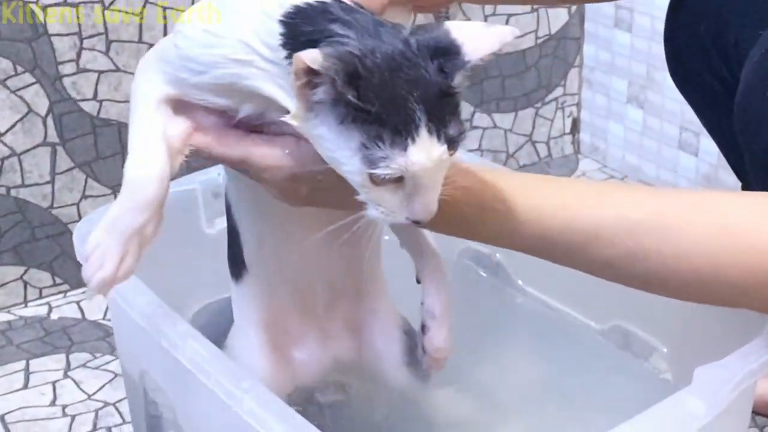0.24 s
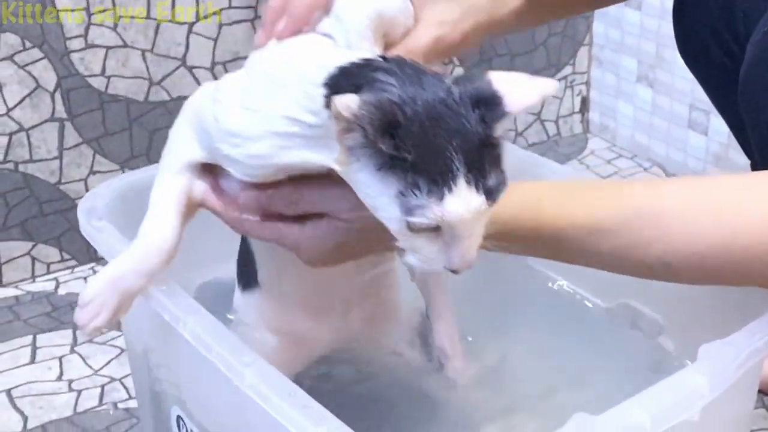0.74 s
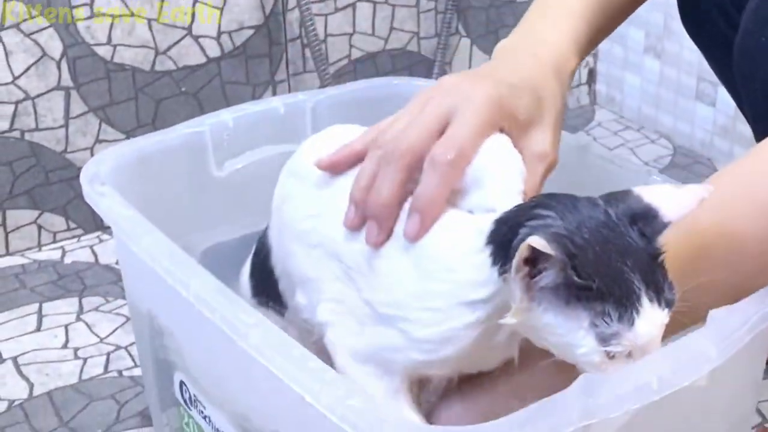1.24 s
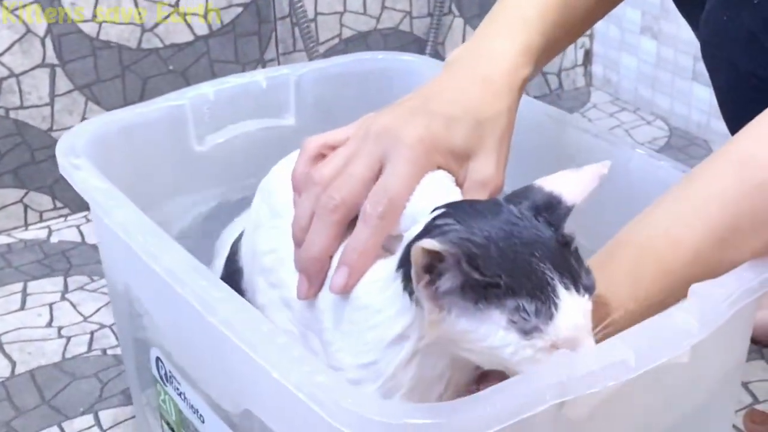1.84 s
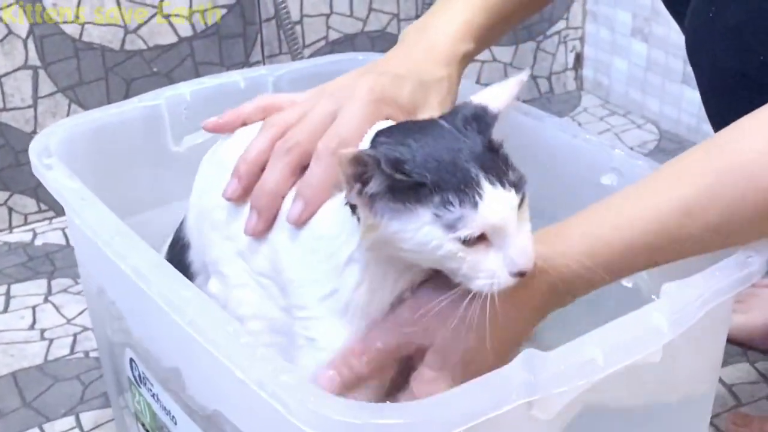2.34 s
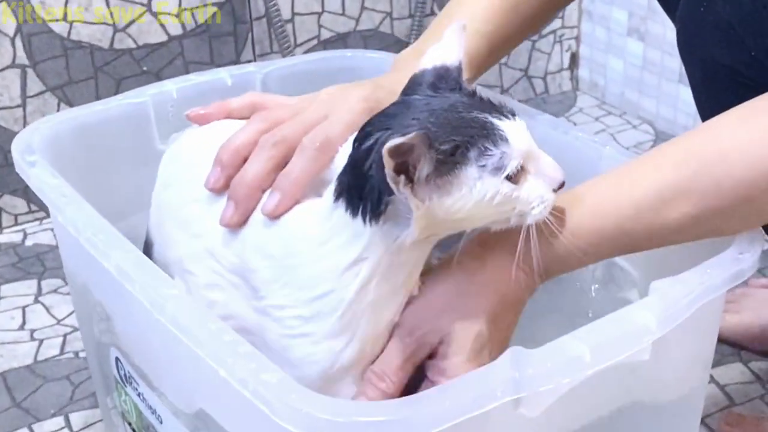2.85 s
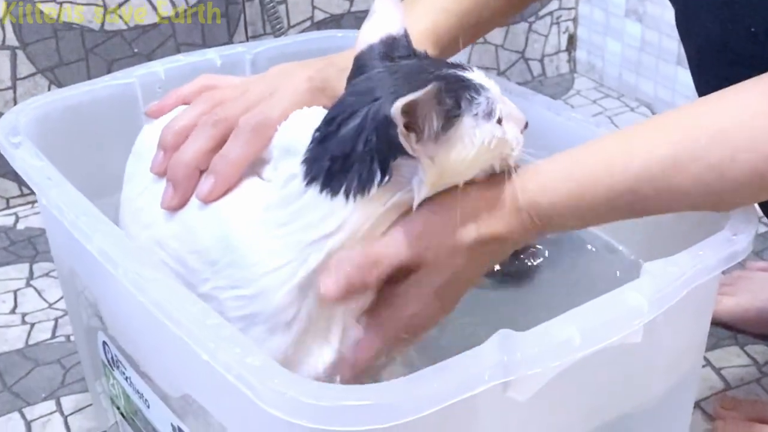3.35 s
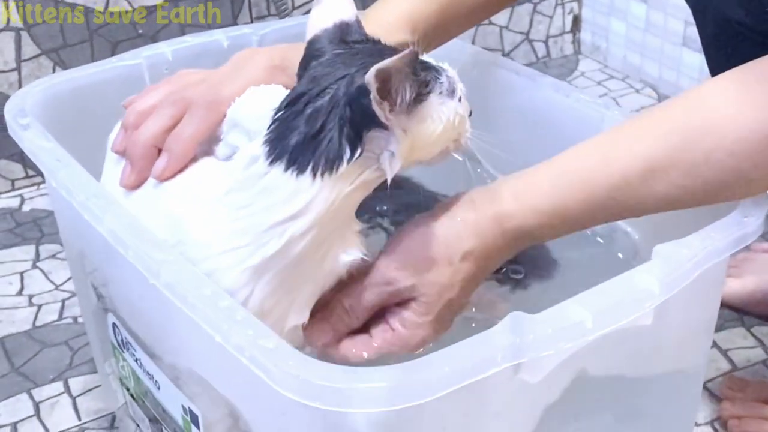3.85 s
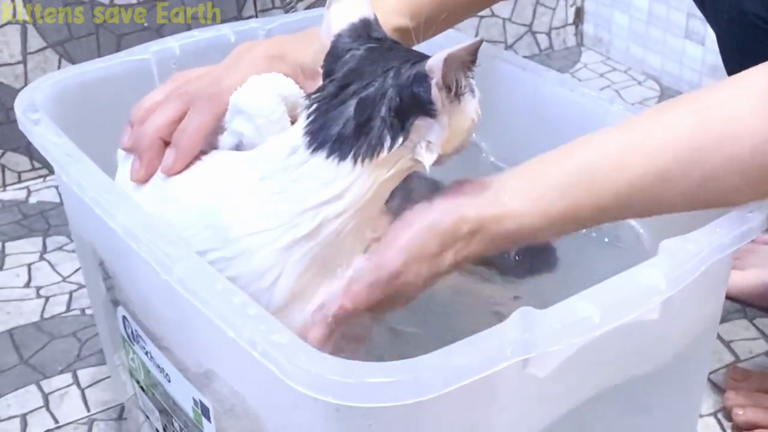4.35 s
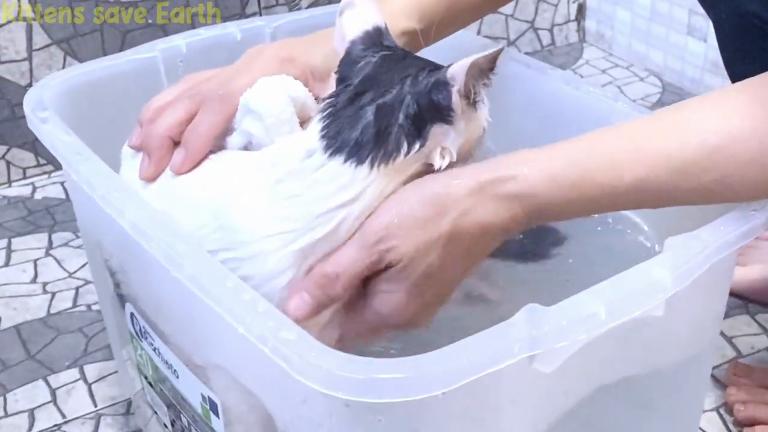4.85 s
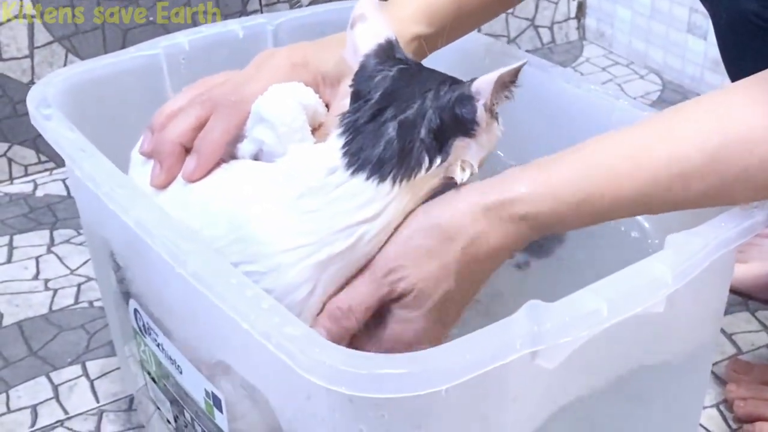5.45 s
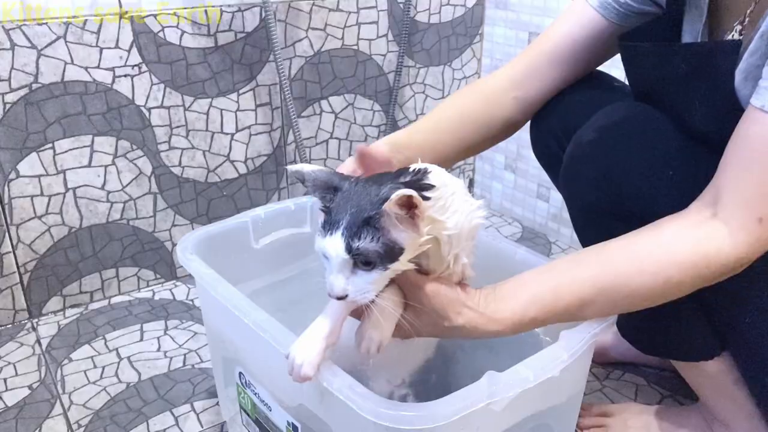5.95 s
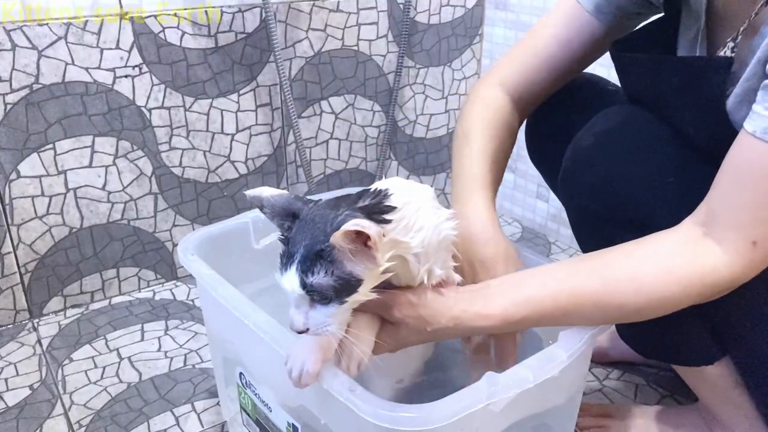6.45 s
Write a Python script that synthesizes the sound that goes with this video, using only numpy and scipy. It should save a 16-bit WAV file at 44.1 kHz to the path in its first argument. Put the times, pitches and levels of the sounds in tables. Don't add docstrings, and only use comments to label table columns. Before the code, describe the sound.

Heard close in stereo: sparse plinks in shallow water, then something lowered in with a rush of bubbles, froth and a low heave against the plastic walls. Sharp little plops and a pause with drips follow, then repeated hand splashes, wet slaps and gurgling rinses. An abrupt change leaves near silence with faint drops. The small tiled room adds a short bright reverberation.

```python
import sys
import numpy as np
from scipy import signal
from scipy.fft import rfft, irfft, next_fast_len
from scipy.io import wavfile
from scipy.ndimage import map_coordinates

SR = 44100
rng = np.random.default_rng(int(sys.argv[2]) if len(sys.argv) > 2 else 0)


def wrap_up_sound(samples):
    columns = np.atleast_2d(samples).T
    tamed = np.clip(columns, -1, 1)
    steps = np.round(tamed * 32767).astype(np.int16)
    wavfile.write(sys.argv[1], SR, steps)


def to_linear_factor(level_db):
    exponent = np.asarray(level_db, float) / 20
    return 10 ** exponent


N = 295205

# start in seconds, peak level in dB, pitch in Hz, level of the satellite droplets in dB.
DRIPS = [(.042, -53.5, 2390, -9), (0.166, -39, 3470, -7), (0.209, -51, 5130, -20), (0.479, -66, 1040, -1),
         (0.6493, -40.5, 1983, -9), (0.696, -53, 1980, -0.5), (0.9232, -45.5, 2760, -15.5),
         (0.924, -52.5, 1254, -3), (0.9924, -32, 1740, -11.5), (1.165, -54, 4000, -8.5),
         (1.2347, -49.5, 5000, -4.5), (0.6474, -55, 4530, 0.5), (3.566, -41, 1610, -16),
         (3.654, -44, 1244, -8), (3.7246, -42, 1425, -14), (3.8157, -53, 3670, -1.5),
         (3.9496, -46.5, 1546, -15.5), (4.007, -55, 1340, -14.5), (4.0817, -45, 1940, -10.5),
         (4.02, -51.5, 1093, -8.5), (4.15, -49, 2220, -8.5), (6.0604, -51, 3900, -14),
         (6.149, -59, 2076, 3.5), (6.2218, -48.5, 2120, -13), (6.251, -53, 2570, -10.5),
         (6.326, -56, 1690, -16.5), (6.366, -56.5, 5400, -2.5), (6.535, -52, 2645, -2.5),
         (6.558, -46, 5840, 0.5), (6.62, -40, 680, -10)]
PLUNGES = [(1.2781, -29, 2670, -5.5), (1.2823, -21, 3340, -15.5), (1.289, -30, 1360, -24),
           (1.671, -34, 1054, -9), (1.31, -28.5, 1055, -22), (1.321, -25, 3550, -4),
           (1.354, -16.5, 938, -12.5), (1.397, -22, 895, -3), (1.41, -26.5, 721, -12.5),
           (1.4546, -22, 2416, -10.5), (1.47, -28, 626, -13), (1.484, -27.5, 953, 0.5),
           (1.5743, -24, 2135, -8.5), (1.5866, -35, 4890, 5.5), (1.6694, -30, 1443, -4.5),
           (1.712, -37.5, 2130, 3.5), (1.8025, -30.5, 1500, -21), (1.843, -29, 824, -14),
           (1.8463, -28, 1534, -24), (1.8634, -30, 1340, -11), (1.879, -26.5, 781, -12),
           (1.8877, -29, 2720, 0.5), (1.951, -37.5, 1265, -2.5), (2.029, -32, 3990, -7),
           (2.0315, -30.5, 2270, -1), (2.0463, -40, 3000, -1), (2.062, -35, 1123, -11.5),
           (2.2244, -32, 1354, -5), (2.2294, -41, 3020, 11)]
DABS = [(2.4019, -47.5, 2370, -16), (2.4021, -43.5, 6670, -6.5), (2.606, -55, 570, 7),
        (2.605, -40, 3220, 7), (2.635, -39.5, 4400, -4), (2.605, -46, 2690, 6), (2.675, -54, 564, -5.5),
        (2.835, -49.5, 2740, -13.5), (2.9694, -40, 2310, -1), (2.9856, -36.5, 2163, -6.5),
        (3.0131, -19.5, 2170, -14.5), (2.6, -37.5, 4000, -17), (3.014, -29.5, 1615, -5),
        (3.315, -36, 8520, -9.5), (3.797, -54, 3300, 2.5), (3.305, -34, 1600, -17.5),
        (3.2858, -31.5, 3360, 0.5), (3.2887, -19.5, 1454, -5), (3.293, -23, 1090, -23),
        (3.308, -30.5, 709, -4.5), (3.3136, -26, 2830, 5), (3.483, -37.5, 958, -7), (3.328, -24, 1100, 3.5),
        (3.329, -26.5, 1780, -7.5), (3.372, -39, 1300, 5.5), (3.459, -29.5, 1600, -8.5),
        (3.4567, -41, 4550, -4), (3.458, -45, 6400, -8.5)]
SCOOPS = [(4.253, -41.5, 2410, -23), (4.251, -38, 1475, -5.5), (4.2624, -26.5, 3050, -9),
          (4.28, -22, 1494, -2), (4.282, -30, 1195, -12.5), (4.2812, -23.5, 3820, -10),
          (4.287, -24, 580, -18), (4.362, -31.5, 588, 2), (4.378, -22.5, 3780, -3),
          (4.3782, -23, 6120, -3.5), (4.42, -30, 1106, -35.5), (4.444, -36, 1540, -18.5),
          (4.5595, -36, 2000, -13), (4.572, -30.5, 3626, 3.5), (4.581, -13.5, 2030, -6.5),
          (4.7472, -34, 2020, -23), (4.7861, -21.5, 1708, 4.5), (4.789, -21, 1064, -52.5),
          (4.788, -21, 3380, -2.5), (4.808, -22, 3060, -9), (4.83, -18.5, 786, -3.5), (4.87, -30, 970, -10),
          (4.847, -26.5, 673, 2), (4.962, -33, 1550, -14.5), (4.986, -35.5, 635, -13.5),
          (4.86, -29, 540, -6)]
RINSES = [(5.1, -35, 1580, -10), (5.1108, -21, 2530, -21), (5.1461, -30.5, 3030, 4),
          (5.165, -31, 1150, 0.5), (5.186, -19.5, 866, -2.5), (5.188, -29, 608, -5), (5.204, -32, 940, 9.5),
          (5.5, -30.5, 753, -8), (5.267, -30.5, 1002, 7), (5.3162, -29, 3140, -11),
          (5.3179, -25.5, 2275, -4.5), (5.4167, -23.5, 1595, -11.5), (5.423, -27.5, 1216, -35),
          (5.481, -35, 570, -22), (5.485, -25, 997, -7.5), (5.495, -39.5, 3480, 2),
          (5.537, -33, 1080, -12.5), (5.556, -30, 1073, -15), (5.5873, -42, 1530, 4.5),
          (5.631, -39, 2800, -19), (5.68, -36.5, 1210, -27), (5.692, -35, 1440, -3),
          (5.715, -34, 1283, -10), (5.6982, -34.5, 2225, 1.5), (5.738, -25, 2660, -11.5),
          (5.766, -35, 633, 6.5), (5.778, -42, 5340, 6), (5.788, -26.5, 1041, -9),
          (5.893, -40.5, 1920, -5.5), (5.893, -28.5, 625, -36)]
# (s, dB, Hz, dB).
CLEAR = [(2.007, -45, 5150, 5.5), (2.0551, -33.5, 2177, -10), (3.014, -24.5, 2276, -9.5),
         (3.022, -32.5, 4080, -29), (3.03, -41, 3530, -12), (3.535, -55, 4080, -4), (3.56, -60, 7250, 7),
         (4.1145, -53.5, 5010, 3), (5.146, -41, 5090, -30), (5.4948, -44, 5180, -10),
         (5.497, -54, 6000, -9), (5.5867, -41.5, 4700, -7), (5.7883, -38.5, 4860, 3.5),
         (6.01, -66.5, 4950, -5), (6.594, -51.5, 678, -3)]
# (s, dB, Hz, dB).
POCKETS = [(1.002, -47, 1790, -25.5), (1.358, -31, 1420, -18.5), (2.0555, -33, 2200, -30),
           (5.788, -30.5, 800, -15), (3.0295, -33, 2700, -27), (3.2862, -29, 1700, -19),
           (3.2965, -19.5, 1493, -16), (3.3125, -17, 1546, -25), (3.328, -23, 1460, -14),
           (4.575, -20, 2030, -18.5), (5.168, -30.5, 1650, -8.5), (5.3185, -28.5, 1514, -16.5),
           (5.789, -38, 1018, -17.5), (3.02, -49.5, 700, -12.5), (4.3, -43, 768, -15),
           (3.95, -55, 996, -16), (3.68, -58.5, 482, -23), (1.293, -25, 1420, -24.5),
           (1.315, -26.5, 1060, -21.5), (1.375, -28, 959, -24.5), (1.43, -27, 730, -21),
           (1.53, -30, 1400, -15), (1.555, -30, 2300, -15.5), (3.018, -19.5, 2198, -24),
           (3.294, -29.5, 1077, -26), (3.48, -43, 985, -23), (5.1405, -14.5, 1032, -14.5),
           (4.834, -26.5, 904, -21.5), (5.2, -31, 2050, -8), (5.207, -25, 900, -21.5),
           (5.44, -39, 3600, -20), (5.6, -39.5, 3200, -21), (1.711, -36.5, 2186, -15.5),
           (4.315, -31, 4100, -18.5), (5.94, -35, 645, -27), (4.381, -23, 741, -11.5),
           (2.21, -25.5, 787, -15)]
CLEAR_LASTS, POCKET_LASTS = 2.7, 1.23
LIFE_CYCLES, LIFE_GROWS = 12.9, 0.19
SCATTER_S, SCATTER_GROWS = .016, 0.35

# start in seconds, peak level in dB.
FLECKS = [(0.1655, -66), (0.407, -63), (0.5462, -70), (0.9896, -58), (1.1353, -51.5), (1.2321, -55),
          (1.2705, -49), (1.5702, -36), (2.23, -56), (2.3895, -54), (2.4012, -50), (2.608, -34),
          (3.0002, -65.5), (3.2897, -46), (3.315, -36), (3.4471, -53.5), (3.5603, -51), (4.0148, -69),
          (4.0532, -57), (4.1315, -47), (4.1773, -53.5), (4.2787, -44), (4.3485, -42.5), (4.377, -24.5),
          (4.559, -37), (4.573, -32.5), (4.7875, -44), (5.021, -52), (5.144, -50), (5.2926, -49),
          (5.4415, -43), (5.676, -54), (5.693, -51), (5.7598, -46), (6.3619, -71), (6.5393, -55),
          (3.797, -60), (3.817, -62)]
# start in seconds, peak level in dB.
SLAPS = [(0.99, -55.5), (1.14, -54), (1.27, -44.5), (1.4311, -47.5), (1.5718, -40.5), (1.595, -33),
         (2.232, -52), (2.61, -33), (3.2901, -66), (3.314, -40), (4.0505, -52.5), (4.116, -65),
         (4.134, -55), (4.1792, -47.5), (4.275, -67), (4.347, -46.5), (4.373, -48), (4.56, -39),
         (4.576, -27.5), (4.786, -46.5), (5.317, -47.5), (5.396, -61), (5.4423, -43.5), (5.4974, -36.5),
         (5.6777, -48), (5.761, -44), (6.532, -56)]
# frequency in Hz, level in dB per Hz.
SMACK = [(880, -49.5), (1500, -31.5), (3600, -5), (5560, -21), (6510, -5), (10300, -8.5), (12600, -19),
         (13200, -38), (14700, -9.5), (15800, -44)]

# start in
# seconds, level in dB, centre in Hz, width in octaves, length in seconds.
SHEETS = [(.885, -72.5, 2380, 0.59, 0.052), (1.14, -64.5, 6000, 1, 0.11),
          (1.163, -55.5, 4310, 0.27, 0.0091), (1.232, -51.5, 3350, 0.82, 0.049),
          (1.279, -39, 3130, 0.28, 0.13), (1.36, -41, 2900, 0.37, 0.2), (1.49, -57, 1980, 0.31, 0.13),
          (1.575, -43, 2570, 0.74, 0.14), (1.69, -50, 2200, 0.87, 0.093), (1.88, -49, 2970, 0.61, 0.09),
          (2.03, -41, 3250, 0.29, 0.06), (2.402, -59, 6420, .15, 0.025), (2.604, -36.5, 3390, 0.31, 0.034),
          (2.606, -51.5, 7070, 0.92, 0.022), (3.014, -53.5, 5100, .12, 0.055),
          (3.286, -37.5, 2580, 0.47, 0.033), (3.312, -36, 3460, 0.7, 0.027), (3.455, -55, 5240, .14, 0.042),
          (3.53, -58.5, 4020, .05, 0.076), (4.25, -46, 2514, .5, 0.034), (4.281, -41.5, 3260, 0.37, 0.13),
          (4.378, -42.5, 5080, 0.42, 0.068), (4.556, -45, 4010, .8, .02), (4.574, -34, 3470, 0.81, 0.038),
          (4.788, -38.5, 2610, 0.48, 0.097), (5.11, -44.5, 2590, 0.37, 0.043),
          (5.14, -42, 2600, 0.67, 0.14), (5.318, -42.5, 2860, 0.24, 0.072),
          (5.42, -44.5, 2740, 0.12, 0.083), (5.49, -50, 3600, 0.33, 0.11), (5.63, -54, 2740, 0.14, .05),
          (5.69, -45, 2200, 0.52, 0.049), (5.76, -50.5, 4650, 0.81, 0.055), (6.535, -62, 3600, 0.94, 0.067),
          (0.477, -59.5, 795, 0.63, 0.014), (0.699, -67.5, 327, .5, 0.049), (0.948, -69, 744, 0.44, 0.06),
        (1.045, -74, 7000, 0.95, 0.13), (1.191, -68.5, 900, 0.33, 0.093), (1.717, -61, 330, 0.33, 0.071),
        (3.015, -41, 1520, 0.33, 0.059), (3.022, -55, 3650, .12, 0.042), (3.33, -49, 600, .2, .12),
        (3.459, -49.5, 5180, .13, 0.051), (4.581, -64.5, 307, 0.57, 0.09), (4.621, -62, 760, 0.23, 0.088),
        (4.586, -42.5, 1660, 0.19, 0.067), (5.019, -61, 7590, 0.18, .02), (5.423, -57, 395, 0.23, 0.27),
        (5.549, -48, 3800, .12, 0.065), (5.62, -52, 756, .25, 0.089), (2.239, -49, 1080, .2, 0.09),
        (2.07, -52.5, 2200, .05, 0.12)]
SHEET_RISE_S, SHEET_FALL_DB = 0.0014, 12
LUMP_DB, LUMPS_PER_S = 4, 250

# time in seconds, agitation in dB, hand depth in dB (deep strokes gurgle).
SLOSH = [(1.255, -49, 4), (1.33, -40, -5), (1.45, -36, -1), (2.13, -55.5, 2), (2.47, -75, -6.5),
         (3.01, -69.5, -7), (3.21, -64, -20.5), (3.47, -72.5, -3), (3.78, -72.5, 1.5), (4.2, -66, -9),
         (4.44, -43, -6), (4.77, -44.5, -21.5), (4.98, -50, 10), (5.38, -46, 4.5), (5.78, -50, 8.5),
         (5.96, -78.5, 3), (6.45, -90.5, -1.5), (6.58, -61.5, 2.5)]
SPRAY_DB, SPRAY_GROWS, CALM_DB = -65, 0.93, -51

# peak time in seconds, heave level in dB, wall ring level in dB, build-up in seconds.
PUSHES = [(1.0, -71, -96, .05), (1.46, -48, -45.5, 0.27), (3.04, -56, -48, 0.066), (3.33, -81, -59.5, .1),
          (3.62, -65.5, -77, 0.16), (4.33, -54, -51, .08), (4.86, -60, -39, 0.11), (5.28, -56.5, -77, 0.14),
          (5.58, -68.5, -46, 0.36), (5.83, -96, -49, 0.12), (6.69, -47.5, -51.5, 0.18)]
BUILD_DB, STILL_DB = 26.5, -78
HEAVE_FALL, WALL_FALL = 84, 142
# frequency in Hz, level in dB per Hz.
HEAVE = [(24, -57.5), (40, -18), (83, -3), (163, 2), (260, -7.5), (340, -45.5), (570, -120)]
# frequency in Hz, width in Hz, level in dB.
WALL = [(311.3, 35, 0)]

# frequency in Hz, time to fall 60 dB in seconds.
TILES = [(150, 0.35), (600, 0.53), (2000, 0.51), (5000, 0.51), (12000, 0.35)]
EDIT_S = 5.971
# frequency in Hz, level in dB per Hz.
HUSH = [(15, -33.5), (55, -7.5), (120, -11), (486, -9.5), (929, -20.5), (2150, -23), (4950, -31.5),
        (10500, -31.5), (13100, -41.5), (14600, -35.5), (15800, -47)]

# frequency in Hz, left-right likeness (ratio).
ALIKE = [(60, 0.62), (150, 0.61), (380, 0.19), (950, -0.05), (2380, 0.14), (5980, 0.04), (15000, 0.33)]
# frequency in Hz, left lead in radians.
LEAD = [(0, 0), (340, -0.3), (780, 2.2), (2240, 0.4), (3270, 2.0), (5000, 0.7), (8610, -3.4), (10300, -6.2),
        (11700, -6.4), (12600, -9.3), (14000, -9.6), (16200, -14.1)]
# frequency in Hz, left minus right in dB.
LEAN = [(60, -5.5), (150, -0.5), (380, -1), (950, 2), (2380, 1), (5980, 5), (15000, -4.5)]
# frequency in Hz, level in dB.
CAPSULE = [(5000, 0), (6300, 1), (8500, 2), (10500, -3.5), (13200, 0), (14800, -2.5), (15300, -2.5),
           (15800, -15)]
TOP_HZ = 15800


def bubbles(table, lasts=1, count=24):
    s, db, hz, drops_db = np.transpose(table)
    luck = rng.standard_normal((len(s), count, 3))
    scatter_s = SCATTER_S * to_linear_factor(SCATTER_GROWS * drops_db)
    when = s[:, None] + scatter_s[:, None] * np.abs(luck[..., 0])
    pitch = np.clip(hz[:, None] * np.exp(0.25 + 0.34 * luck[..., 1]), 520, 14000)
    level = (db + drops_db - 10)[:, None] + 2 * luck[..., 2]
    drops = rings(when.ravel(), level.ravel(), pitch.ravel(), 11, rise=0.08, size=420)
    cycles = lasts * LIFE_CYCLES * (hz / 1000) ** LIFE_GROWS
    return rings(s, db + 4.0, hz, cycles, rise=0.11, size=1300, swell=1.56) + drops


def rings(s, db, hz, cycles, rise, size, swell=0.7):
    t = np.arange(size) / SR
    age = t * (hz / cycles)[:, None]
    swelling = (1 - np.exp(-t * hz[:, None] / swell)) ** 2
    decay = to_linear_factor(-20 * age * np.sqrt(age))
    fade_out = np.hanning(2 * size)[size:]
    climb = 1 + rise * (np.minimum(age, 1) / 2 - .2)
    tone = np.sin(2 * np.pi * hz[:, None] * t * climb)
    wave = to_linear_factor(db)[:, None] * swelling * decay * fade_out * tone
    at = np.round(s * SR).astype(int)[:, None] + np.arange(size)
    return np.bincount(at.ravel(), wave.ravel(), N + SR)[:N]


def flecks():
    s, db = np.repeat(FLECKS, 4, axis=0).T
    luck = rng.uniform(0, 1, (len(s), 2))
    pitch = 6500 * 2.5 ** luck[:, 1]
    return rings(s + 0.0018 * luck[:, 0], db - 5.5, pitch, 10.0, rise=.1, size=200)


def slaps():
    out, t = np.zeros(N + SR), np.arange(1500) / SR
    for s, db in SLAPS:
        shape = to_linear_factor(db + 6.0 - 60 * t / 0.017) * (1 - np.exp(-t / 0.0052))
        out[round(s * SR):][:len(t)] += shape * rng.standard_normal(len(t))
    return filtered(out[:N], lambda hz: to_linear_factor(along(SMACK, hz) - along(SMACK, 12430)))


def froth(table):
    out, t = np.zeros(N + SR), np.arange(12000) / SR
    for s, db, hz, octaves, length_s in table:
        lumps = to_linear_factor(LUMP_DB * map_coordinates(rng.standard_normal(200), [t * LUMPS_PER_S], mode="wrap"))
        bell = lambda f: np.exp(-(np.log2((f + 1) / hz) / octaves) ** 2 / 2)
        hiss = filtered(lumps * rng.standard_normal(len(t)), bell)
        shape = (1 - np.exp(-t / SHEET_RISE_S)) * to_linear_factor(-SHEET_FALL_DB * (t / length_s) ** 2)
        out[round(s * SR):][:len(t)] += to_linear_factor(db) * shape * unit(hiss)
    return out[:N]


def slosh():
    agitation_db, depth_db = curves(SLOSH)
    gurgle = swarm(hz=841.4, spread=.25, cycles=49.0, uneven_db=8.5, count=1200, size=1000)
    splash = swarm(hz=2420, spread=0.33, cycles=34.0, uneven_db=6.5, count=1800, size=800)
    spray = swarm(hz=5500, spread=.4, cycles=22.0, uneven_db=6, count=3500, size=300)
    spray_db = SPRAY_DB + SPRAY_GROWS * (agitation_db - CALM_DB)
    moving = to_linear_factor(agitation_db + depth_db - 8.5) * gurgle + to_linear_factor(agitation_db - 5.5) * splash
    return moving + to_linear_factor(spray_db) * spray


def swarm(hz, spread, cycles, uneven_db, count, size):
    s = rng.uniform(0, N / SR, count)
    size_luck = np.minimum(rng.exponential(1, count), 2.5)
    pitch = np.clip(hz * np.exp(spread * rng.standard_normal(count)), 500, 15500)
    return unit(rings(s, uneven_db * size_luck, pitch, cycles, rise=0.2, size=size))


def tub():
    s, heave_db, wall_db, build_s = np.transpose(PUSHES)[..., None]
    after = np.arange(N) / SR - s

    def swell(db, fall):
        slope = np.where(after < 0, -BUILD_DB / build_s, fall)
        return to_linear_factor(np.maximum(STILL_DB, np.max(db - slope * after, axis=0)))

    def wall(f):
        return sum(to_linear_factor(db) * 1j * f * w / (c * c - f * f + 1j * f * w) for c, w, db in WALL)

    heave = unit(filtered(rng.standard_normal(N), lambda hz: to_linear_factor(along(HEAVE, hz))))
    hum = unit(filtered(rng.standard_normal(N), wall))
    return to_linear_factor(-6.5) * swell(heave_db, HEAVE_FALL) * heave + to_linear_factor(-10) * swell(wall_db, WALL_FALL) * hum


def room(dry, tails, size=4096):
    dry, m = np.pad(dry, size), next_fast_len(size + tails.shape[-1])
    answers, out = rfft(tails, m), np.zeros((2, len(dry) + m))
    for k, i in enumerate(range(0, len(dry) - size, size // 2)):
        piece = rfft(dry[i:i + size] * np.hanning(size), m)
        out[:, i:i + m] += irfft(piece * answers[k % len(tails)], m)
    return out[:, size:len(dry) - size]


def tile_tails(count):
    hz, t, z = signal.stft(rng.standard_normal((count, 2, 26000)), SR, nperseg=256)
    near_walls = 1 + 0.15 * to_linear_factor(-60 * t / 0.027)
    fall = to_linear_factor(-60 * t / along(TILES, hz)[:, None]) * near_walls
    tails = np.array([paired(two) for two in signal.istft(z * fall, SR, nperseg=256)[1]])
    tails *= np.minimum(np.arange(tails.shape[-1]) / SR / 0.024, 1) ** 1.3
    return tails / np.linalg.norm(tails[0, 0])


def paired(two):
    turn = lambda hz: np.arccos(np.clip(along(ALIKE, hz), 0, 1)) / 2
    mid, side = filtered(two, lambda hz: np.array([np.cos(turn(hz)), np.sin(turn(hz))]))
    return np.array([mid + side, mid - side])


def hush():
    tone = filtered(paired(rng.standard_normal((2, N))), lambda hz: to_linear_factor(along(HUSH, hz)))
    return to_linear_factor(-74.5) * unit(tone)


def unit(x):
    return x / np.sqrt(np.mean(x ** 2) + 1e-20)


def along(points, hz):
    f, v = np.transpose(points)
    return np.interp(np.log(hz + 1), np.log(f + 1), v)


def curves(rows):
    s, *cols = np.transpose(rows)
    return [np.interp(np.arange(N) / SR, s, c, left=-110) for c in cols]


def filtered(x, response):
    m = next_fast_len(x.shape[-1] + 8192)
    return irfft(rfft(x, m) * response(np.fft.rfftfreq(m, 1 / SR)), m)[..., :x.shape[-1]]


def scene():
    water = bubbles(np.concatenate([DRIPS, PLUNGES, DABS, SCOOPS, RINSES]))
    water = water + bubbles(CLEAR, CLEAR_LASTS) + bubbles(POCKETS, POCKET_LASTS)
    water = water + flecks() + slaps() + froth(SHEETS) + slosh() + tub()
    tails, cut = tile_tails(count=9), round(EDIT_S * SR)
    wet = np.concatenate([room(water[:cut], tails), room(water[cut:], tails)], axis=1)
    return water + to_linear_factor(-0.5) * wet + hush()


def top_cut(x):
    return signal.sosfilt(signal.butter(12, 16610, fs=SR, output="sos"), x)


def record(dry):
    half = np.array([[.5], [-.5]])

    def ports(hz):
        return to_linear_factor(half * along(LEAN, hz)) * np.exp(1j * half * np.interp(hz, *np.transpose(LEAD)))

    def band(hz):
        low_cut = hz ** 2 / (hz ** 2 + 45 ** 2)
        return to_linear_factor(along(CAPSULE, hz)) * (hz < TOP_HZ) * low_cut

    return top_cut(filtered(dry, lambda hz: ports(hz) * band(hz)))


dry = scene()
out = record(dry)
wrap_up_sound(out)
```